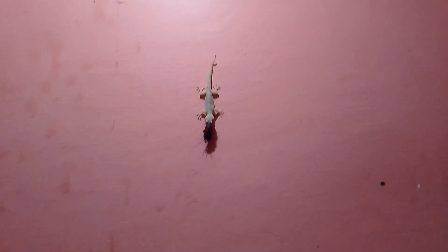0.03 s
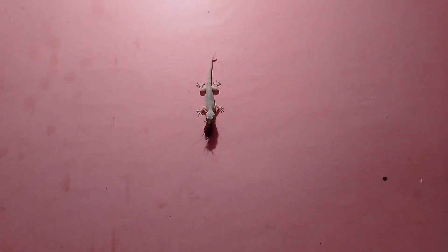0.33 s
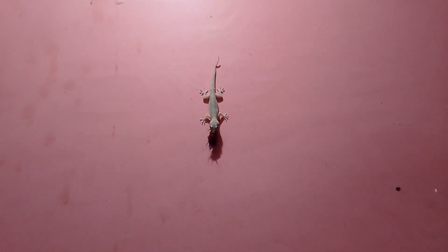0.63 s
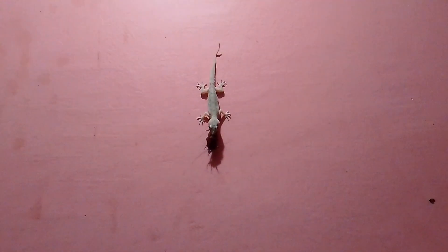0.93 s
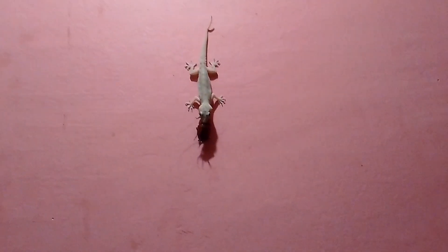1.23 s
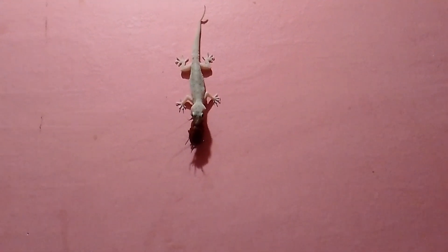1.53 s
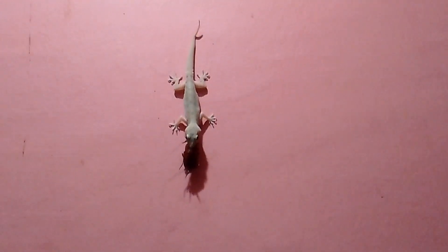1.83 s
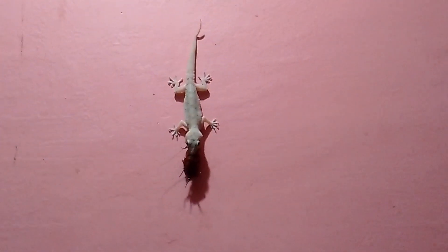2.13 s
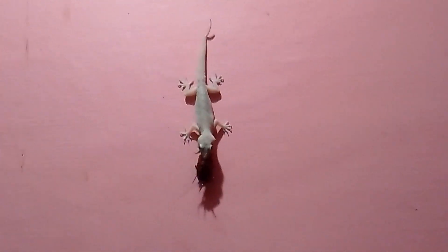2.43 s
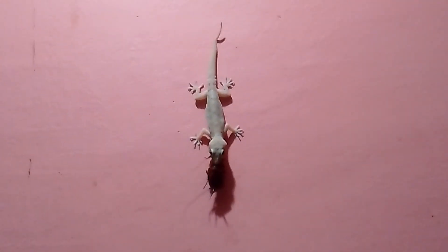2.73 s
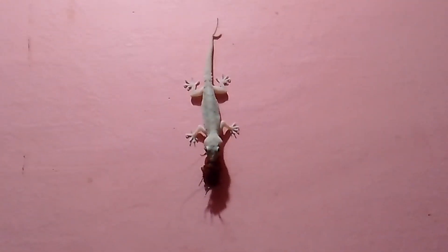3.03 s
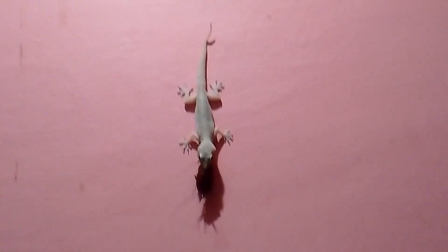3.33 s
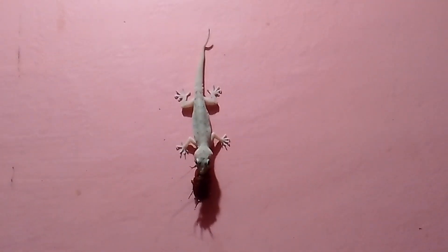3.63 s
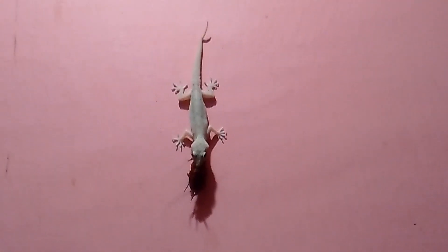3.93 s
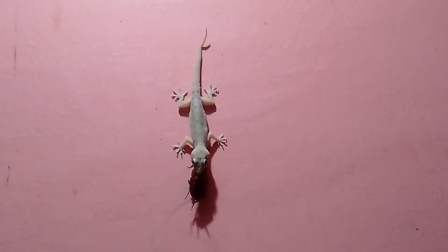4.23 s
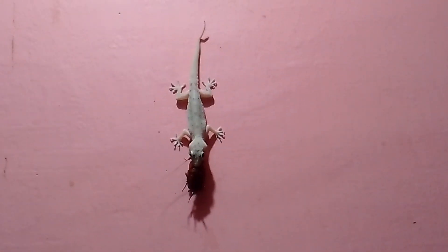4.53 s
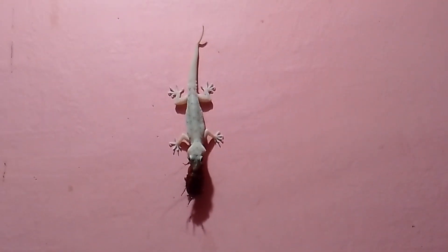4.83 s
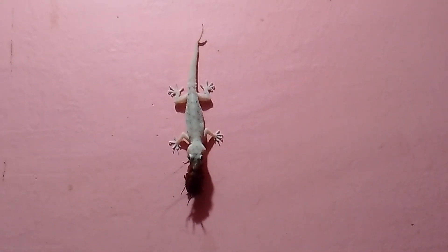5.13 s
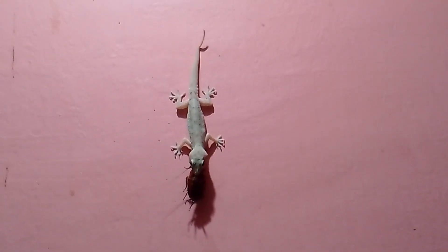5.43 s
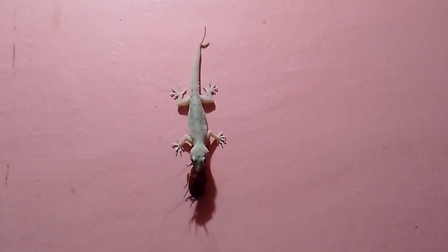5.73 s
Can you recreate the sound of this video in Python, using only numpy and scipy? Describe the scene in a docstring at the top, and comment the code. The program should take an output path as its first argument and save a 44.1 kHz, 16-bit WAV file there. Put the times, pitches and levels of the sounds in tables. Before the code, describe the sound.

Close handling noise on a plastic camera body sounds over steady, quiet room tone with a faint hum and high hiss. Small taps open the scene, and after a pause fingernails click and fingertips thud softly on the shell. Two stronger knocks follow less than a second apart, with short scratchy slides and a low rumble between them, all right at the microphone. Then the handling stops and only the room is heard.

```python
"""A quiet room, where a small hand-held camera points at a silent gecko on the wall.
Fingers shift on the plastic housing, right next to the built-in microphone: nails and loose parts
click and ring the shell, pads land with soft thuds, and skin slides in tiny catches and slips.
Behind them lie steady room noise, a low hum, thin far hisses (one perhaps an insect) and the faint
hiss and whine of the camera's electronics."""
import sys
import numpy as np
from scipy import signal
from scipy.fft import rfft, irfft
from scipy.io import wavfile

SR = 44100
rng = np.random.default_rng(int(sys.argv[2]) if len(sys.argv) > 2 else 0)


def master(y):
    """Save y as 16-bit WAV."""
    cut = np.clip(np.atleast_2d(y).T, -1, 1)
    pcm = np.round(cut * 32767)  # scale
    wavfile.write(sys.argv[1], SR, pcm.astype(np.int16))


N = 260190
TIME = np.arange(N) / SR
THUD_PER_PANEL = 0.47  # pitch of the camera rocking in the hand, as a share of the panel's


def knocks():
    """Nails and loose parts strike the housing."""
    # hard hits: (time [s], panel pitch [Hz], panel level [dB], thud level [dB],
    # clack pitch [Hz], clack level [dB], tick level [dB])
    hits = [(0.1281, 573, -44, -54, 1370, -45.5, -91), (0.1297, 260, -70, -44.5, 2000, -49.5, -71),
            (0.1488, 423, -32.5, -40, 1220, -33, -83), (0.182, 387, -47.5, -41, 3100, -43, -47.5),
            (2.4041, 317, -52, -36.5, 1350, -42, -93), (2.5651, 345, -40.5, -34.5, 910, -42, -69),
            (2.5787, 400, -63, -56, 1200, -46, -67), (2.5936, 356, -32, -31, 930, -31, -66),
            (2.8654, 343, -80, -38.5, 1400, -50.5, -56.5), (3.3241, 416, -37.5, -47, 1510, -46.5, -62),
            (3.3655, 344, -16, -11.5, 1800, -29, -48.5), (4.0465, 228, -20, -15, 1090, -36, -65),
            (4.068, 209, -25.5, -25, 1750, -44, -72), (4.081, 300, -56, -34.5, 2530, -60, -68.5),
            (4.0887, 400, -64, -45, 1700, -54, -86), (4.0981, 480, -70, -45, 1820, -57, -73),
            (4.1293, 287, -20.5, -52, 1970, -30.5, -57), (4.3966, 402, -77, -54.5, 2010, -61, -83),
            (4.4306, 400, -80, -77, 3000, -76, -77)]
    out = np.zeros(N)
    for s, *strike in hits:
        add(out, s, contact(*strike))
    return out


def bumps():
    """Finger pads land softly: mostly thud, with more ring the firmer (higher) they are."""
    # pad landings: (time [s], thud pitch [Hz], thud level [dB])
    landings = [(0.1165, 90, -38), (0.152, 101, -33), (0.197, 200, -54), (1.0945, 177, -43.5),
                (1.3005, 117, -44.5), (2.3056, 164, -50), (2.506, 98, -30), (2.7382, 200, -56),
                (2.7677, 109, -45), (3.2331, 106, -35), (3.3624, 144, -15.5), (3.3875, 125, -29.5),
                (3.4928, 165, -38), (3.6619, 114, -33), (3.9718, 138, -40.5), (4.1734, 133, -46.5)]
    out = np.zeros(N)
    for s, hz, db in landings:
        ring_db = db + 24 * np.log2(hz / 140)
        add(out, s, contact(panel_hz=hz / THUD_PER_PANEL, panel_db=ring_db - 15, thud_db=db,
                            clack_hz=1000, clack_db=ring_db - 29.5, tick_db=db - 46))
    return out


def contact(panel_hz, panel_db, thud_db, clack_hz, clack_db, tick_db, size=4096):
    """A contact rocks the camera in the hand, flexes a panel, rings the shell and ticks at its seams."""
    age = np.arange(size) / SR
    chatter = .045 * rng.standard_normal(size) * np.exp(-age / 0.0021)  # loose parts
    push = signal.unit_impulse(size) + chatter
    thud_hz = THUD_PER_PANEL * panel_hz
    thud = cut(resonate(push, thud_hz, 0.85 * thud_hz), 1.87 * thud_hz, "low", order=2)
    thud = cut(thud, 0.28 * thud_hz, "high", order=1)
    # the harder the contact, the more it drives the panel's second bending mode
    hardness = undb(1.1 * min(clack_db - panel_db + 3.0, 0))
    first_mode = resonate(push, panel_hz, .5 * panel_hz)
    second_mode = resonate(push, 2.01 * panel_hz, 0.43 * panel_hz)
    panel = cut(first_mode + hardness * second_mode, 2.34 * panel_hz, "low", order=4)
    clack = shell(push, clack_hz)
    tick = cut(resonate(push, 4940, 1700), 3800, "high", order=2)
    tick = cut(tick, 6494 + 200 * max(tick_db + 70, 0), "low", order=6)  # louder ticks are brighter
    # the bare snap of the contact lies faintly on top, more so in the sharpest clicks
    snap = undb(-26 + .2 * (tick_db + 52)) * cut(push, 6800, "high", order=2)
    return (hit_level(thud, thud_db) + hit_level(panel, panel_db)
            + hit_level(clack, clack_db) + hit_level(tick + snap, tick_db))


def shell(push, pitch_hz):
    """The plastic shell rings; the place of contact favours the modes near one pitch."""
    # shell modes: (pitch [Hz], width [Hz], relative level [dB])
    modes = [(782, 200, 29), (1038, 200, 17.5), (1360, 390, 5.5), (1660, 310, 2.5), (2140, 240, -19),
             (3120, 390, -20.5), (3960, 710, -17)]
    ring = sum(undb(db - 24 * abs(np.log2(hz / pitch_hz))) * resonate(push, hz, width)
               for hz, width, db in modes)
    ring = cut(ring, 1000 + 1.3 * pitch_hz, "low", order=4)
    return cut(ring, .58 * pitch_hz, "high", order=3)


def slides():
    """Each finger stroke swells and dies: skin hisses, edges scrape the shell, the grip rumbles."""
    # strokes: (peak time [s], rise [s], fall [s], friction level [dB], rumble level [dB])
    strokes = [(2.403, .012, 0.0038, -56, -39), (2.45, 0.019, 0.026, -70, -52.5),
               (2.506, 0.018, .008, -51, -59), (2.58, 0.023, 0.098, -60.5, -51),
               (3.228, 0.031, 0.03, -69, -47.5), (3.319, 0.012, 0.0081, -50, -55),
               (3.395, 0.037, 0.049, -53.5, -45), (3.424, 0.0093, .01, -45.5, -32.5),
               (3.501, .007, .015, -52.5, -36.5), (3.625, .02, 0.029, -52, -40.5),
               (3.665, 0.013, 0.02, -49.5, -47), (3.734, 0.021, 0.014, -50.5, -45.5),
               (3.84, 0.16, 0.071, -59, -76)]
    # skin friction as the housing passes it on: (frequency [Hz], relative level [dB])
    friction_eq = [(150, -4), (350, 3.5), (650, -1), (1100, -10.5), (2800, -13), (4500, -18.5),
                   (6500, -26.5), (7800, -35.5), (11500, -42.5), (13500, -62), (15500, -63)]
    # low rumble of the gripping hand: (time [s], level [dB])
    grip = [(0, -61.5), (.6, -64), (1.4, -61.5), (1.9, -73), (2.5, -57), (3.1, -63.5), (4.1, -59),
            (4.6, -76), (5.9, -73)]
    friction_power, scrape_power, rumble_power = 0, 0, fader(grip) ** 2
    for s, rise, fall, friction_db, rumble_db in strokes:
        swell = np.exp(-((TIME - s) / np.where(TIME < s, rise, fall)) ** 2)
        # a stroke that stops quickly has caught an edge and scrapes; one that fades hardly does
        scrape_db = friction_db - 12.5 - 12 * np.log2(fall / 0.012)
        friction_power += swell * undb(friction_db) ** 2
        scrape_power += swell * undb(scrape_db) ** 2
        rumble_power += swell * undb(rumble_db) ** 2
    friction = np.sqrt(friction_power) * colour(slips(), friction_eq)
    scrape = np.sqrt(scrape_power) * unit(shell(slips(), pitch_hz=1930))
    rumble = np.sqrt(rumble_power) * band(hz=115, width=170)
    return friction + scrape + rumble


def slips():
    """Skin catches and lets go in dense, tiny, uneven grains."""
    return rng.standard_normal(N) * undb(2 * rng.exponential(size=N) + 1.2 * drift(rate_hz=150))


def room():
    """Room tone: a steady bed of air noise with broad, humming resonances."""
    # air noise: (frequency [Hz], relative level [dB])
    air_eq = [(20, 7), (50, -0.5), (110, -6.5), (180, -10), (240, -10), (320, -10), (560, -14.5),
              (780, -13.5), (1100, -19.5), (1400, -20.5), (2500, -22.5), (3400, -26), (4600, -51.5),
              (8000, -61)]
    # room resonances: (pitch [Hz], width [Hz], level [dB])
    resonances = [(211.8, 25, -65), (240.7, 16.2, -64.5), (767, 35, -74), (1340, 480, -77.5)]
    air = colour(rng.standard_normal(N), air_eq) * undb(-58 + 0.6 * drift(rate_hz=3.5))
    return air + sum(undb(db) * band(hz, width) for hz, width, db in resonances)


def hum():
    """Thin tones, each wavering a little in pitch and level."""
    # hum tones: (pitch [Hz], level [dB])
    tones = [(253, -68), (301, -79.5), (362, -80), (547, -86.5), (684, -80), (759, -87), (862, -81),
             (2268, -86.5)]
    out = np.zeros(N)
    for hz, db in tones:
        phase = 2 * np.pi * np.cumsum(hz + 1.29 * drift(rate_hz=2.84)) / SR
        out += undb(db + 2.7 * drift(rate_hz=2.0)) * np.sqrt(2) * np.sin(phase)
    return out


def far_hiss():
    """A thin, distant hiss that grows late in the scene."""
    # its rise and fall: (time [s], level [dB])
    levels = [(0, -88.5), (2, -93.5), (4.4, -78.5), (4.9, -79), (5.9, -82.5)]
    return fader(levels) * band(hz=3590, width=1100)


def paired_hiss():
    """A faint high hiss, perhaps a far insect, swells in pairs."""
    # first swell of each pair: (peak time [s])
    pairs = [.06, 1.36, 2.65, 3.87, 5.26]
    gap_s, half_length_s = 0.36, 0.14
    swells = sum(np.exp(-(np.abs(TIME - s - lag) / half_length_s) ** 3)
                 for s in pairs for lag in (0, gap_s))
    return undb(-72) * swells * band(hz=2990, width=330)


def electronics():
    """Amplifier hiss with thin lines of whine that pulse together at twice the mains rate."""
    # high harmonics of the mains buzz: (harmonic [number], level [dB])
    harmonics = [(54, -96), (55, -92.5), (56, -95.5), (57, -97), (58, -100), (60, -100)]
    # microphone amplifier hiss: (frequency [Hz], relative level [dB])
    hiss_eq = [(2000, -4.5), (4000, -1.5), (5000, -2.5), (5900, -5), (6700, -5.5), (7800, -18),
               (10000, -14.5), (12500, -23), (15500, -17)]
    buzz_hz = 99.935
    phase = 2 * np.pi * buzz_hz * TIME
    whine = sum(undb(db + 1.9 * drift(rate_hz=3.3)) * np.sqrt(2) * np.cos(k * phase)
                for k, db in harmonics)
    return whine + undb(-82) * colour(rng.standard_normal(N), hiss_eq)


def undb(db):
    """Decibels to gain."""
    return 10 ** (np.asarray(db) / 20)


def unit(x):
    """Scale to an rms of 1."""
    return x / np.sqrt(np.mean(x ** 2))


def fader(points):
    """A gain ride through (time [s], level [dB]) points."""
    return undb(np.interp(TIME, *np.transpose(points)))


def resonate(x, hz, width):
    """One damped resonance, gain 1 at its centre."""
    return signal.lfilter(*signal.iirpeak(hz, hz / width, fs=SR), x)


def cut(x, hz, kind, order):
    """Smooth low-pass or high-pass."""
    return signal.sosfilt(signal.butter(order, min(hz, SR / 2 - 1), kind, fs=SR, output="sos"), x)


def colour(x, points):
    """Apply an EQ curve of (frequency [Hz], relative level [dB]) points; rms 1."""
    hz, db = np.transpose(points)
    bins = np.maximum(np.fft.rfftfreq(N, 1 / SR), 1)
    gain = undb(np.interp(np.log(bins), np.log(hz), db))
    return unit(irfft(rfft(x) * gain, N))


def band(hz, width):
    """Noise through the same resonance twice, for steep sides; rms 1."""
    return unit(resonate(resonate(rng.standard_normal(N), hz, width), hz, width))


def drift(rate_hz):
    """Smooth random wander; rms 1."""
    rolloff = 1 + (np.fft.rfftfreq(N, 1 / SR) / rate_hz) ** 4
    return unit(irfft(rfft(rng.standard_normal(N)) / rolloff, N))


def hit_level(x, db):
    """Set the rms level of a short sound, as if all its energy fell within 10 ms."""
    return x * undb(db) / np.sqrt(np.sum(x ** 2) / (SR / 100))


def add(out, s, sound):
    """Mix in a short sound so that its attack falls at s seconds."""
    start = int((s - 0.00034) * SR)
    out[start:start + len(sound)] += sound[:N - start]


def scene():
    """Close handling noise and the quiet background meet at one microphone."""
    handling = knocks() + bumps() + slides()
    background = room() + hum() + far_hiss() + paired_hiss() + electronics()
    return (handling + background)[None]


def record(dry):
    """The microphone rounds the loudest peaks and the camera cuts the top of the treble."""
    ceiling, top_hz = 1.1, 15700
    rounded = np.tanh(dry / ceiling) * ceiling
    return signal.sosfilt(signal.ellip(8, .2, 70, top_hz, fs=SR, output="sos"), rounded)


dry = scene()
out = record(dry)
master(out)
```